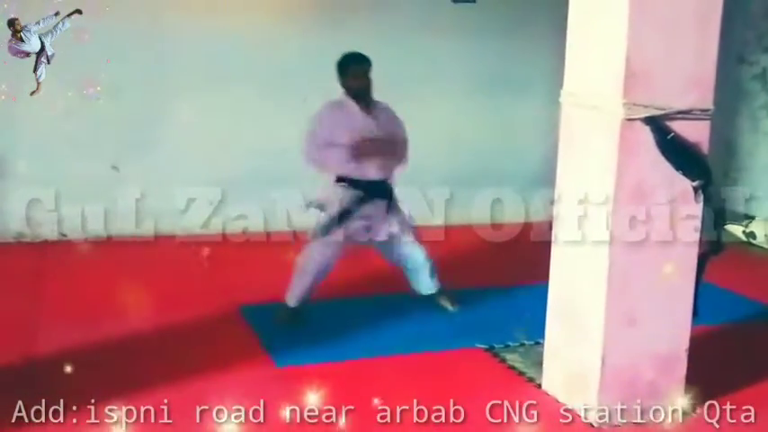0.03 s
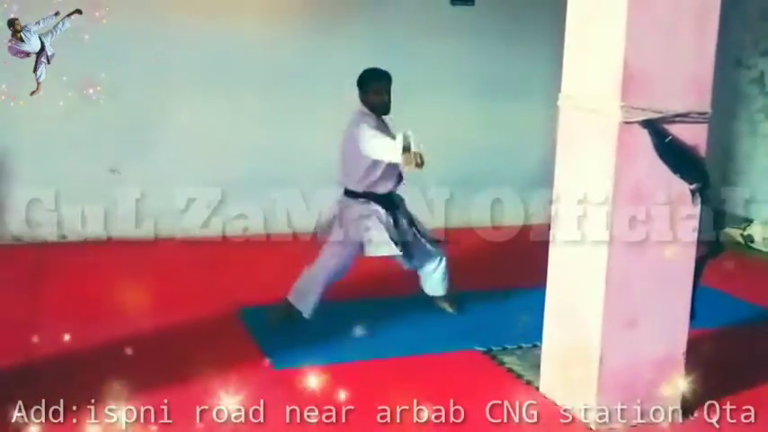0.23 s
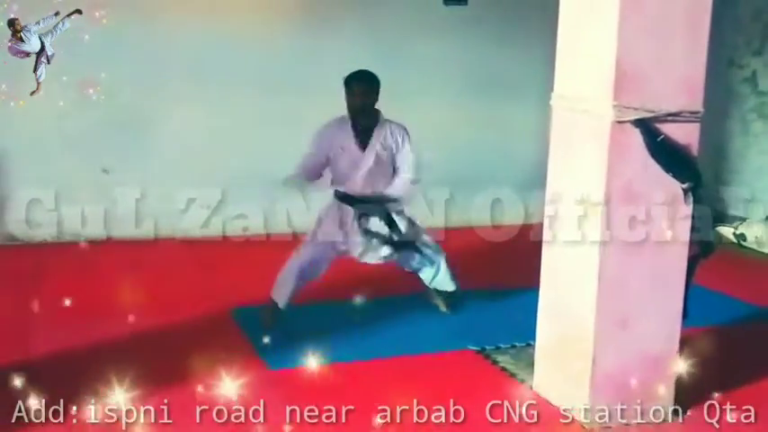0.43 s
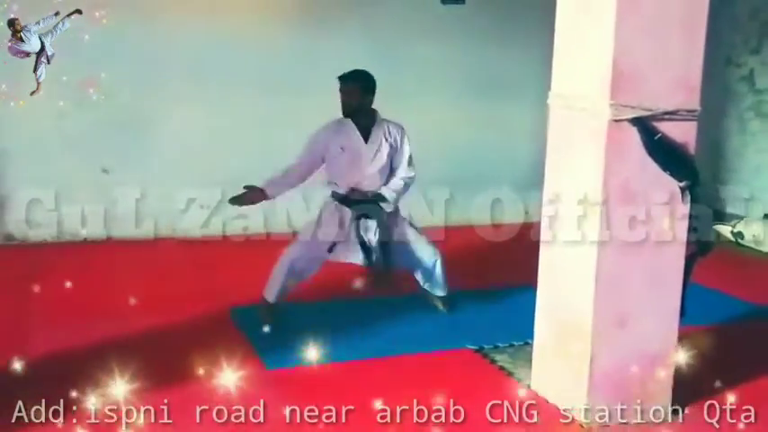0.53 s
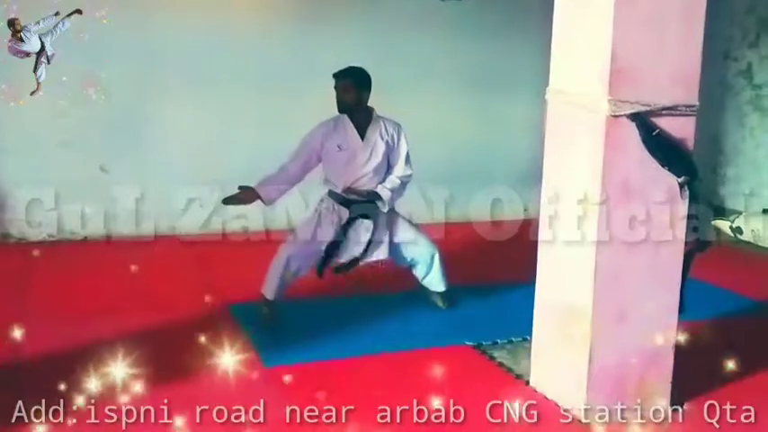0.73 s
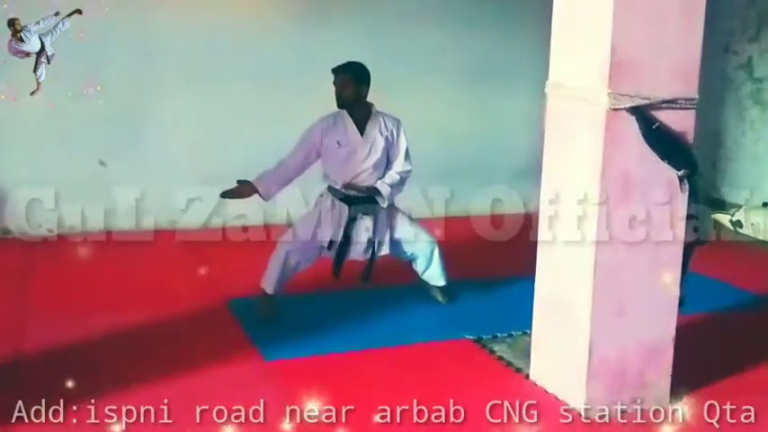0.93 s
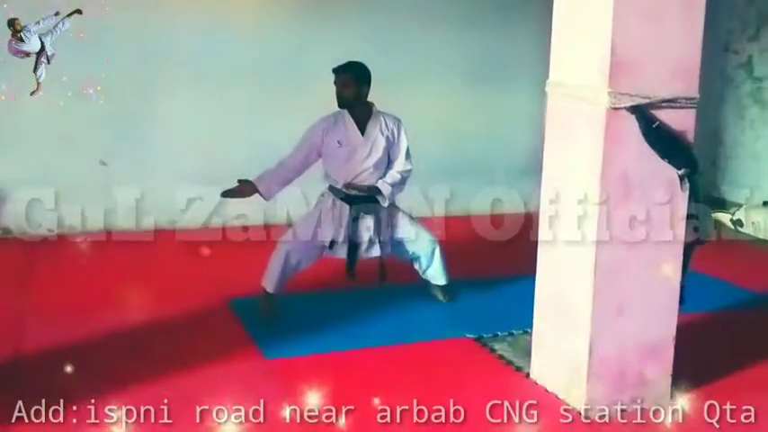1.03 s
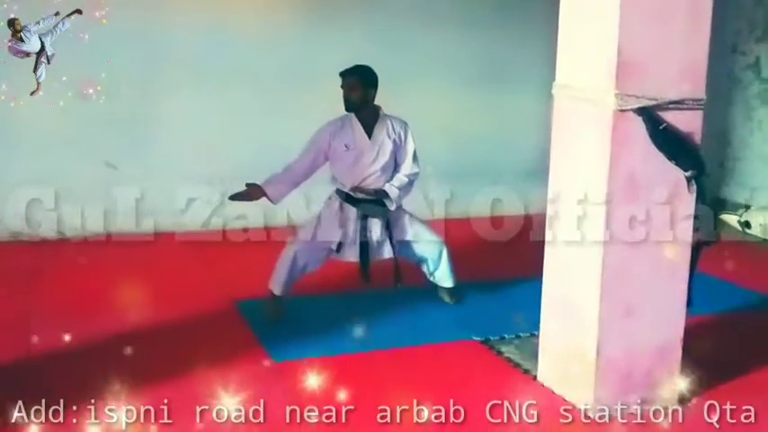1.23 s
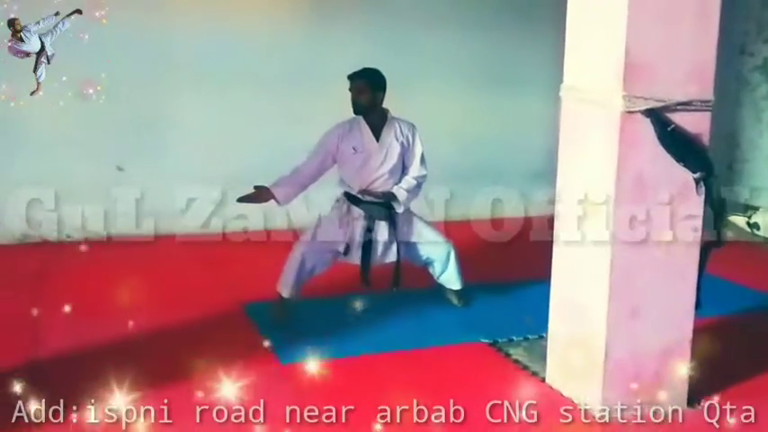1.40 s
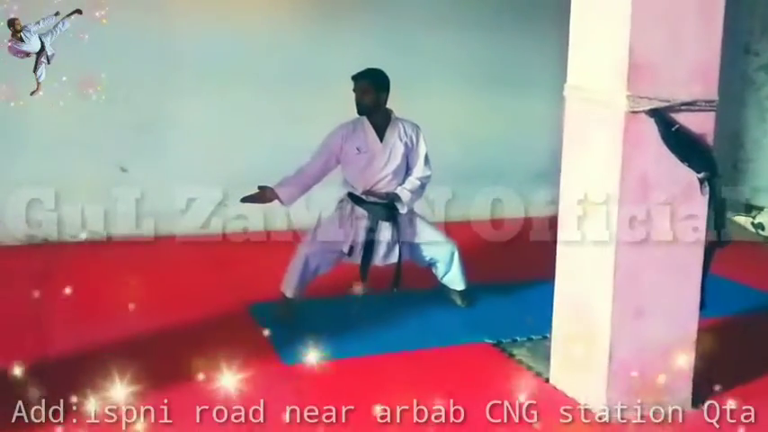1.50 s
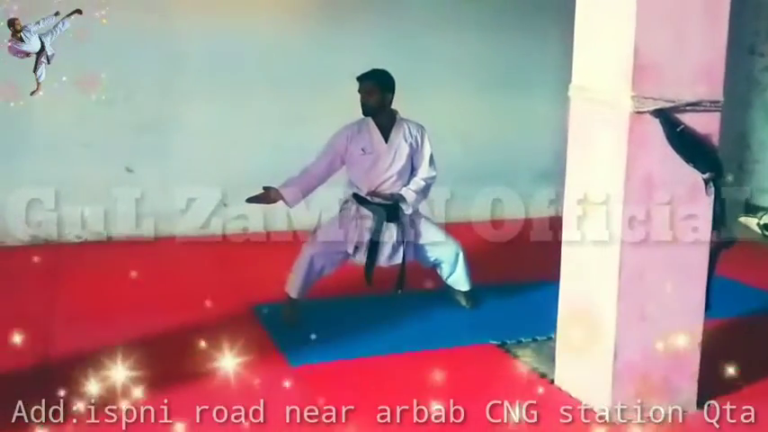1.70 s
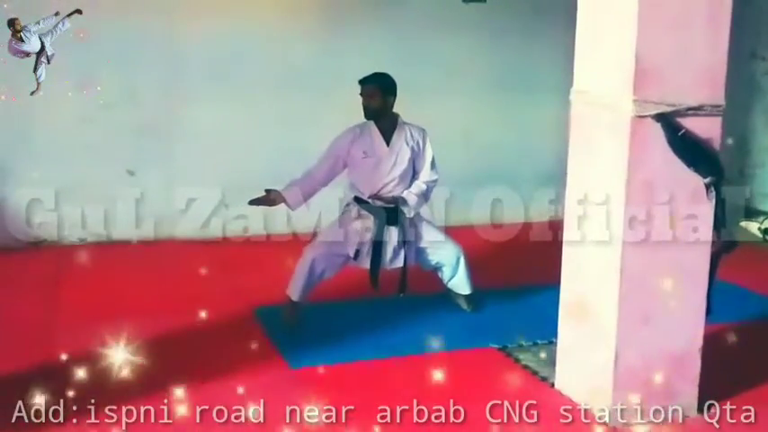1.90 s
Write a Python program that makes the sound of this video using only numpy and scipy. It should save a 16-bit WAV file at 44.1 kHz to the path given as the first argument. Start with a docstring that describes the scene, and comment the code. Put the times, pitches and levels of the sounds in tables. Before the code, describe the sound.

Karate suit snaps in a bare, echoing hall. Low rumble and faint cloth stir open; from 0.2 s heavy cotton swishes and rasps, with hollow fluttering whumps and dull foot thuds on foam. A sharp crack comes at 0.36 s, more swishing, then a tight double-edged crack at 0.7 s. Echoes ring and fade until about 1.4 s; a soft rustle and shift follow near 1.47 s, with a very faint thin whine at the end.

```python
"""A low rumble and a faint stir of cloth, then a karate student drops into a stance on foam in a bare, echoing hall.
His heavy cotton suit swishes and rasps (noise bursts), billows with a hollow note (fluttering sines)
and cracks twice as the arms lock (dense grains); his feet thud on the mat (dull noise).
The hall, a decaying noise response, rings on for a second; then the cloth rustles softly over the rumble."""
import sys
import numpy as np
from scipy import signal
from scipy.fft import rfft, irfft
from scipy.io import wavfile
from scipy.ndimage import uniform_filter1d

SR = 44100
rng = np.random.default_rng(int(sys.argv[2]) if len(sys.argv) > 2 else 0)


def bounce(signal):
    """Save signal as a 16-bit WAV file at the path given by the first command-line argument."""
    frames = np.transpose(np.atleast_2d(signal))
    limited = np.clip(frames, -1, 1)
    pcm = np.round(limited * 32767).astype(np.int16)
    wavfile.write(sys.argv[1], SR, pcm)


N = 85995
TIME = np.arange(N) / SR
BIN_HZ = np.fft.rfftfreq(N, 1 / SR)


def from_db(db):
    """Decibels to gain."""
    return 10 ** (np.asarray(db) / 20)


def rms_one(x):
    """Scale to unit power."""
    return x / np.sqrt(np.mean(x ** 2) + 1e-20)


def at_hz(points, hz):
    """Read a table on a log-frequency axis."""
    f, value = np.transpose(points)
    return np.interp(np.log(np.maximum(hz, 1)), np.log(f), value)


def coloured(x, spectrum):
    """Give a steady noise a spectrum; unit power."""
    gain = from_db(at_hz(spectrum, BIN_HZ))
    return rms_one(irfft(rfft(x) * gain, N))


def swell(s, db, rise, fall):
    """A bell-shaped rise to the peak, then an exponential fall (power drops e-fold in each fall time)."""
    t = TIME - s
    before = -.5 * (np.minimum(t, 0) / rise) ** 2
    after = -np.maximum(t, 0) / fall / 2
    return from_db(db) * np.exp(before + after)


def background():
    """Low, slowly wavering rumble, joined near the end by a faint thin whine."""
    # rumble spectrum: (frequency [Hz], relative density [dB per Hz])
    rumble_colour = [(20, -18), (45, -24), (75, -0.5), (105, 2), (140, 6), (185, -5.5), (260, -6),
                     (380, -12), (600, -26), (1200, -27), (2600, -29), (3600, -43), (4500, -47),
                     (7400, -49), (8500, -54.5), (15500, -53)]
    # rumble strength through the scene: (time [s], level [dB])
    rumble_level = [(0, -40), (.12, -38.5), (1.25, -39), (1.68, -39), (1.80, -40), (1.95, -44.5)]
    whine_start_s, whine_rise_s, whine_hz, whine_db = 1.65, 0.15, 1060, -63
    level_db = np.interp(TIME, *np.transpose(rumble_level))
    rumble = from_db(level_db) * coloured(rng.standard_normal(N), rumble_colour)
    whine_fade = np.clip((TIME - whine_start_s) / whine_rise_s, 0, 1)
    whine = whine_fade * np.sqrt(2) * np.sin(2 * np.pi * whine_hz * TIME)
    return rumble + from_db(whine_db) * whine


def cloth(moves, colour, grains_per_s, spread_db, lag_s, stretch=1):
    """Each move sets off a dense run of tiny fibre slips; its hiss comes a moment after its body."""
    treble_hz = 3950
    sizes = from_db(spread_db * np.minimum(rng.exponential(1, N), 5)) * rng.choice([-1, 1], N)
    slips = rng.random(N) < grains_per_s / SR
    grains = coloured(sizes * slips, colour)
    high_pass = 1 - 1 / (1 + (BIN_HZ / treble_hz) ** 6)
    treble = irfft(rfft(grains) * high_pass, N)
    body = grains - treble
    out = np.zeros(N)
    for s, db, rise, fall, treble_db in moves:
        out += swell(s, db, rise, fall) * body
        out += swell(s + lag_s, db + treble_db, rise * stretch, fall * stretch) * treble
    return out


def swishes():
    """Sleeves and trouser legs sweep and rub: many fibre slips with a barely delayed hiss."""
    # sweeps: (time [s], level [dB], rise [s], fall [s], treble against body [dB])
    sweeps = [(.0, -44.5, .01, 0.02, -5.5), (.160, -46, 0.023, 0.018, -8),
              (.188, -40.5, 0.0075, 0.0071, 2.5), (.219, -32, 0.0027, 0.015, -3),
              (.272, -27.5, 0.036, 0.025, -3), (.440, -22.5, 0.047, 0.071, 3),
              (.775, -24, 0.053, 0.036, 4.5), (1.385, -70, .01, 0.018, 23.5),
              (1.462, -49, 0.017, 0.037, 7.5), (1.690, -61, 0.058, 0.1, 18), (1.920, -64, 0.0094, 0.03, 1)]
    # spectrum: (frequency [Hz], relative density [dB per Hz])
    colour = [(150, 0), (400, 14), (650, 1), (1200, 0.5), (1800, -0.5), (2500, 4), (3500, -4),
              (5000, -16.5), (7400, -20.5), (8600, -28), (11000, -30), (15500, -45.5)]
    return cloth(sweeps, colour, grains_per_s=9000, spread_db=2.0, lag_s=0.0012)


def feet():
    """Dull pushes of bare feet into foam, as low noise bursts."""
    # landings and shifts on the mat: (time [s], level [dB], rise [s], fall [s])
    steps = [(.0, -45.5, 0.015, 0.032), (0.273, -27.5, 0.021, 0.048), (0.457, -25, 0.019, 0.0138),
             (0.503, -29, 0.0045, 0.024), (0.678, -26, 0.0062, 0.019), (0.808, -25.5, 0.0094, 0.044),
             (1.215, -40.5, 0.031, 0.041), (1.479, -38.5, 0.0058, 0.0098), (1.670, -45, .03, 0.023)]
    # spectrum: (frequency [Hz], relative density [dB per Hz])
    colour = [(40, -25), (75, -1.5), (125, 8), (170, 13), (260, 12), (340, -2), (600, -26), (2000, -52)]
    pushes = sum(swell(*step) for step in steps)
    return coloured(rng.standard_normal(N), colour) * pushes


def rasps():
    """Short rubs of cloth and skin whose friction noise gathers round one pitch."""
    # rubs: (time [s], level [dB], centre [Hz], width [Hz], rise [s], fall [s])
    rubs = [(.176, -36.5, 2330, 160, 0.0034, 0.017), (0.2217, -33.5, 1023, 53, 0.0053, 0.019),
            (0.25, -38, 2950, 450, 0.0035, 0.0077), (0.298, -27.5, 1040, 580, 0.028, 0.033),
            (0.39, -25, 1150, 320, .003, .004), (0.34, -29.5, 1500, 260, 0.0021, 0.055),
            (0.69, -23.5, 1230, 540, 0.0036, 0.011), (0.72, -21.5, 1446, 270, 0.0097, 0.016),
            (.359, -25, 2900, 330, 0.0037, 0.003), (.700, -33, 2900, 1900, .004, 0.0074),
            (0.24, -48, 8500, 5500, .025, 0.043), (.155, -65, 9000, 2400, .012, .015),
            (1, -54, 9000, 6000, .005, .007), (0.28, -43, 2000, 1800, 0.0017, 0.0028),
            (.662, -28.5, 2400, 880, 0.0031, 0.015)]
    out = np.zeros(N)
    for s, db, hz, width_hz, rise, fall in rubs:
        edges_hz = [max(hz - width_hz / 2, 50), hz + width_hz / 2]
        band = signal.butter(2, edges_hz, "band", fs=SR, output="sos")
        friction = rms_one(signal.sosfilt(band, rng.standard_normal(N)))
        out += swell(s, db, rise, fall) * friction
    return out


def whumps():
    """Air pushed out of the suit sounds a few fluttering cycles of one low note."""
    # billows: (time [s], level [dB], pitch [Hz], rise [s], fall [s], phase roughness [rad])
    billows = [(0.234, -12.5, 402, 0.0067, 0.0066, 0.37), (.270, -16.5, 393, 0.0032, 0.0061, .3),
               (.321, -19, 380, 0.0052, 0.0037, 0.23), (.351, -11.5, 448, 0.0038, 0.0036, 0.15),
               (.396, -17.5, 447, 0.0077, 0.0058, 0.42), (.540, -19.5, 383.5, 0.013, 0.011, 0.76),
               (.688, -25.5, 390, 0.0053, 0.0059, 0.51), (.775, -24, 401.7, 0.006, 0.06, 1.23),
               (0.929, -29, 405.6, .02, 0.018, 1.1), (1.010, -25.5, 385.6, 0.0086, 0.0086, 0.46),
               (1.470, -44.5, 391.5, 0.035, 0.028, 1.04)]
    flutter_hz = 42.8
    slow = signal.butter(2, flutter_hz, fs=SR, output="sos")
    out = np.zeros(N)
    for s, db, hz, rise, fall, rough in billows:
        flutter = rms_one(signal.sosfilt(slow, rng.standard_normal(N)))
        phase = 2 * np.pi * hz * (TIME - s) + rough * flutter
        out += swell(s, db, rise, fall) * np.sqrt(2) * np.sin(phase)
    return out


def snaps():
    """The cloth cracks taut: sharp runs of fibre slips whose hiss lags and lasts longer."""
    # cracks: (time [s], level [dB], rise [s], fall [s], treble against body [dB])
    cracks = [(.363, -16.5, 0.0074, 0.012, -0.5), (.660, -30.5, 0.0055, 0.005, 0.5),
              (.698, -18.5, 0.0042, 0.0052, 0), (.707, -19.5, 0.0027, 0.0094, -11.5)]
    # spectrum: (frequency [Hz], relative density [dB per Hz])
    colour = [(150, -43), (400, 7), (650, -0.5), (1000, -5), (1500, 5.5), (2700, -6), (3700, -8.5),
              (5000, -16), (7400, -15), (8600, -23.5), (11000, -25), (15500, -35)]
    return cloth(cracks, colour, grains_per_s=12000, spread_db=1.6, lag_s=0.01, stretch=1.69)


def evened(x):
    """Level the fine ripple in the spectrum of a burst, keeping its broad colour."""
    even_hz = 22
    spectrum, span = rfft(x), int(even_hz * N / SR)
    power = abs(spectrum) ** 2
    broad = abs(uniform_filter1d(power, 10 * span)) + 1e-12
    fine = abs(uniform_filter1d(power, span)) + 1e-12
    return irfft(spectrum * np.sqrt(broad / fine), N)


def hall_tail():
    """Dense echoes build up, hold briefly and die at a rate set band by band; near unit gain in the mids."""
    # time for the hall to die by 60 dB: (frequency [Hz], decay [s])
    decay_60db = [(100, 0.85), (240, 2.58), (420, 1.22), (700, 1.16), (1100, 0.67), (1800, 0.99),
                  (4800, 0.75), (7500, 0.63), (10000, 0.19), (15000, 0.29)]
    delay_s, build_s, hold_s = 0.0038, 0.028, 0.021
    white = rfft(rng.standard_normal(N))
    centres = np.geomspace(60, 16000, 18)
    place = np.interp(BIN_HZ, centres, np.arange(len(centres)))
    dying_s = np.maximum(TIME - hold_s, 0)
    tail = np.zeros(N)
    for k, centre in enumerate(centres):
        share = np.maximum(1 - abs(place - k), 0)  # overlapping triangular bands
        tail += irfft(white * share, N) * np.exp(-np.log(1000) * dying_s / at_hz(decay_60db, centre))
    build = 1 - np.exp(-np.maximum(TIME - delay_s, 0) / build_s)
    fade_out = np.clip(2 - 2 * TIME / TIME[-1], 0, 1) ** 2
    energy = SR * (hold_s + at_hz(decay_60db, 1000) / np.log(1e6))
    return build * evened(tail) * fade_out / np.sqrt(energy)


def hall(x):
    """The echoes of a sound, with the hall's favoured pitches standing out."""
    # favoured pitches: (pitch [Hz], width [Hz], boost [dB])
    peaks = [(165, 16, 4), (405, 50, 1), (486, 18, 4), (876, 11, 8), (1185, 14, 6), (1331, 12, 7),
             (1426, 14, 7), (1514, 14, 11), (1603, 20, 8), (1696, 13, 6), (1816, 20, 8), (2118, 13, 8),
             (2266, 15, 8), (2426, 22, 8), (2753, 22, 8), (3221, 14, 7), (7550, 220, 5)]
    wet = signal.fftconvolve(x, hall_tail())[:N]
    for hz, width_hz, boost_db in peaks:
        ringing = signal.lfilter(*signal.iirpeak(hz, hz / width_hz, fs=SR), wet)
        wet = wet + (from_db(boost_db) - 1) * ringing
    return wet


def scene():
    """Cloth and feet, heard directly and through the hall, over the background."""
    # (sound, send to the hall [dB])
    sources = [(swishes(), -6.5), (feet(), -8), (rasps(), -2.0), (whumps(), -4.5), (snaps(), 2)]
    direct = sum(x for x, _ in sources)
    echoes = hall(sum(from_db(wet_db) * x for x, wet_db in sources))
    return (direct + echoes + background())[None]


def record(dry):
    """The microphone loses the deep bass; peaks are rounded and the top is cut."""
    low_cut_hz, cutoff_hz, fade_in_s = 81, 15550, .004
    faded = dry * np.minimum(TIME / fade_in_s, 1)
    thin = signal.sosfilt(signal.butter(4, low_cut_hz, "high", fs=SR, output="sos"), faded)
    rounded = .9 * np.tanh(thin / .9)
    return signal.sosfilt(signal.ellip(12, .1, 80, cutoff_hz, fs=SR, output="sos"), rounded)


dry = scene()
out = record(dry)
bounce(out)
```